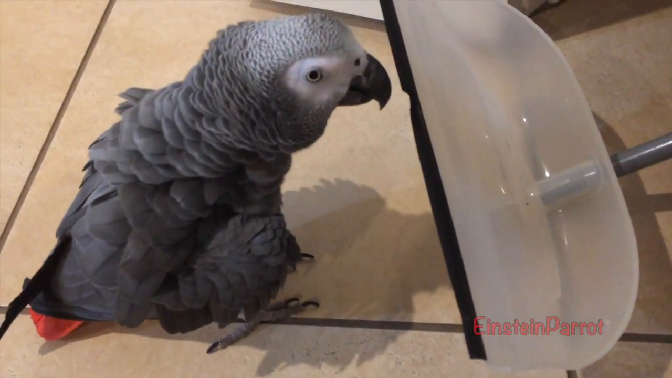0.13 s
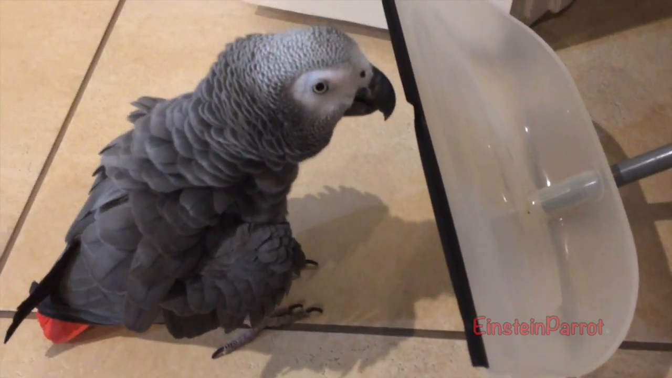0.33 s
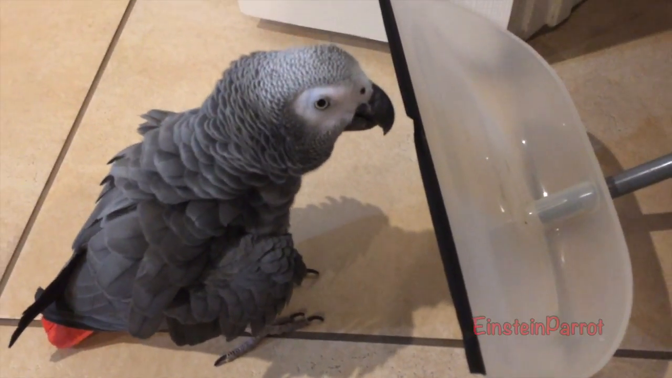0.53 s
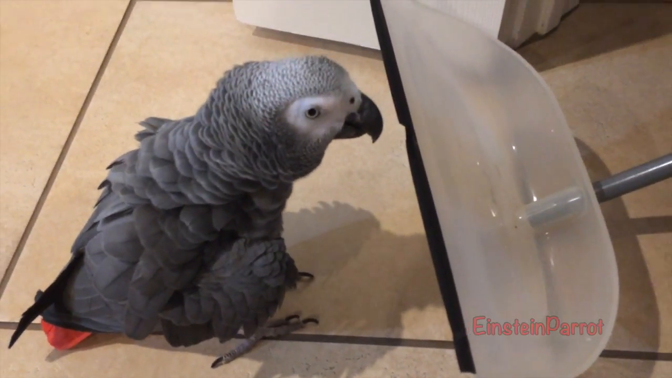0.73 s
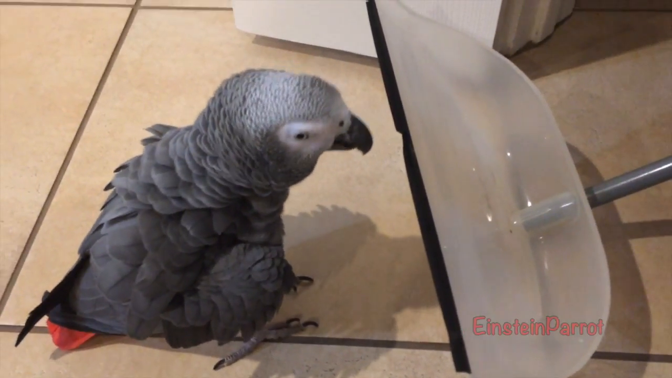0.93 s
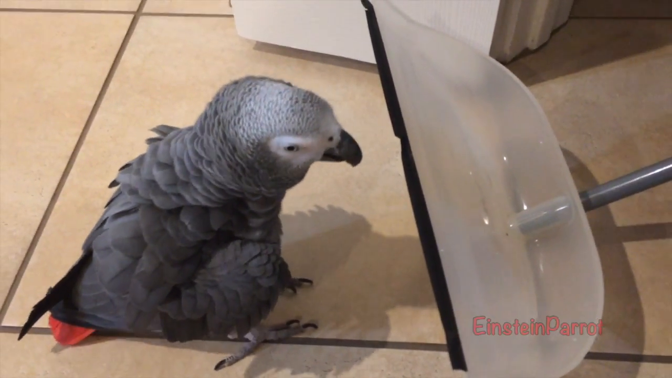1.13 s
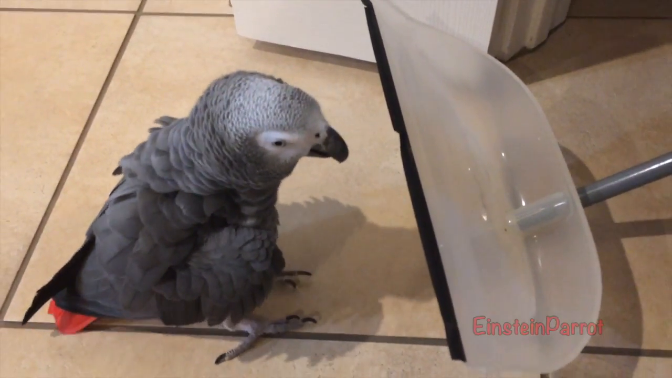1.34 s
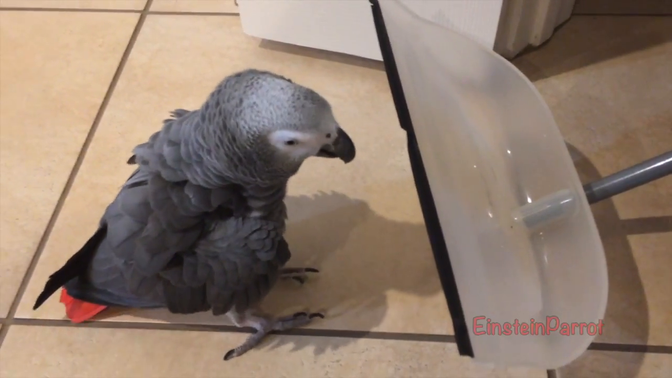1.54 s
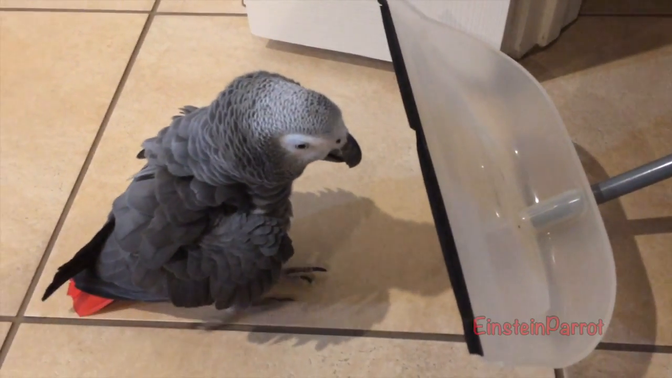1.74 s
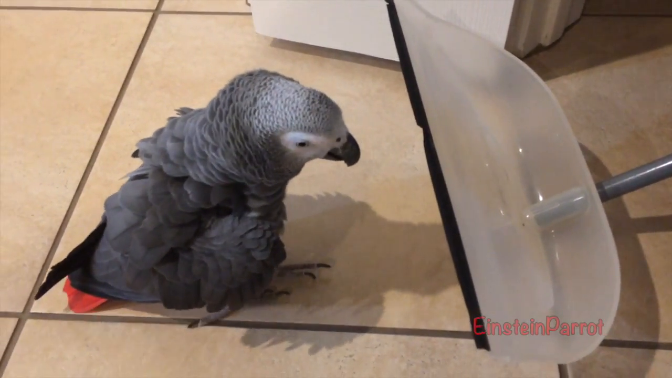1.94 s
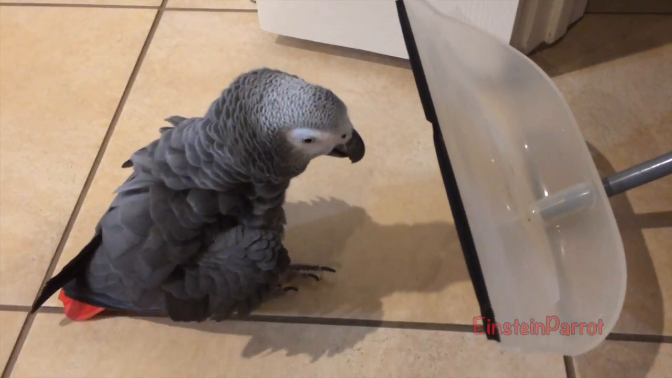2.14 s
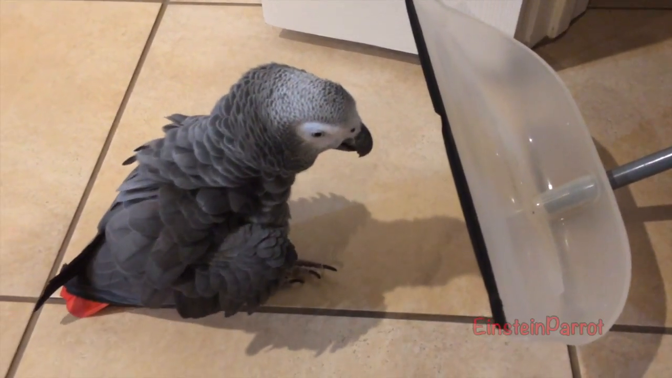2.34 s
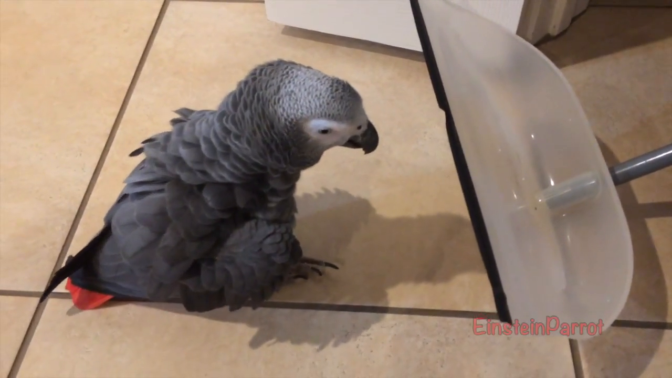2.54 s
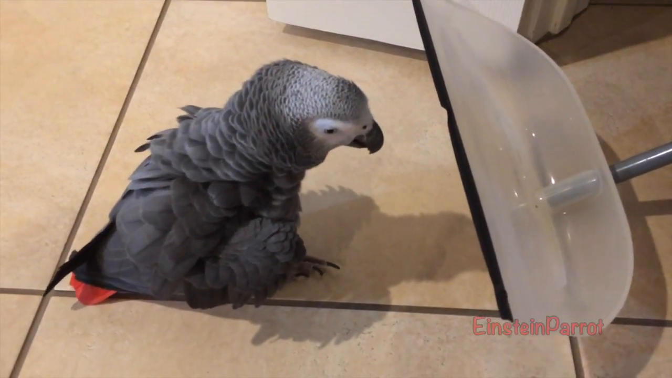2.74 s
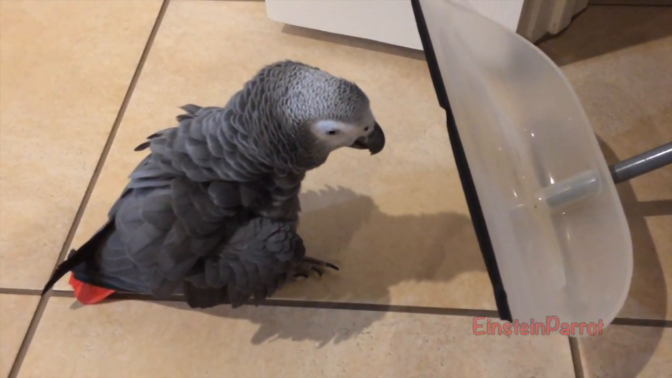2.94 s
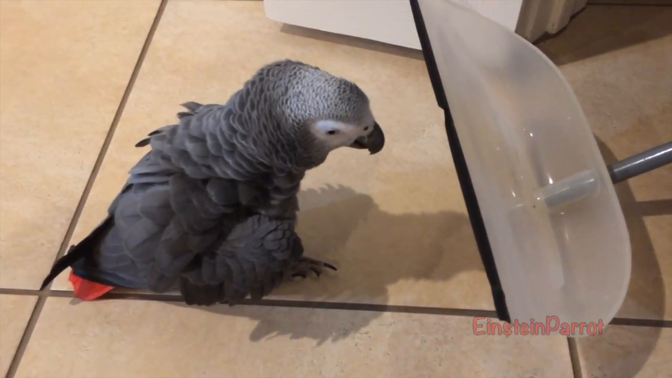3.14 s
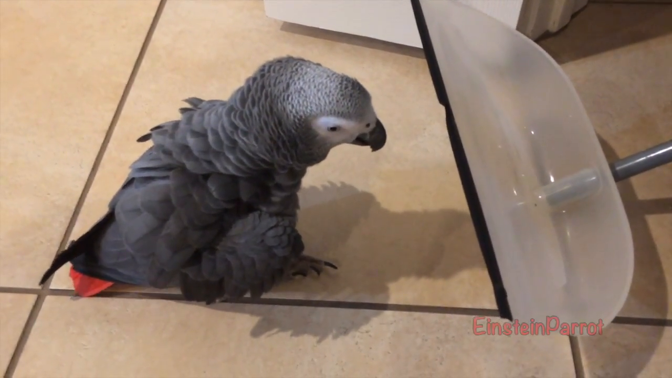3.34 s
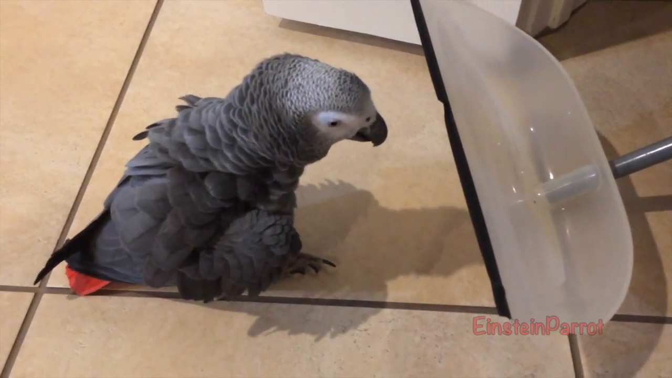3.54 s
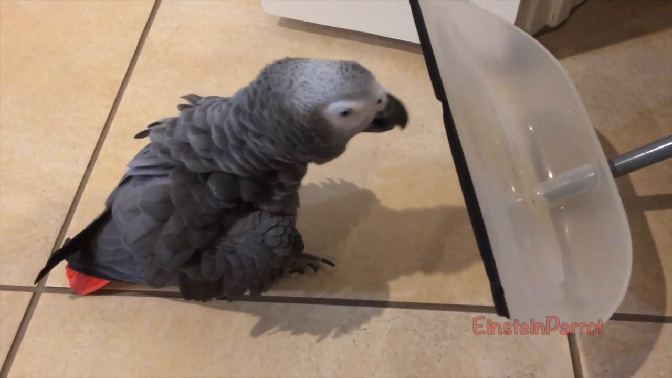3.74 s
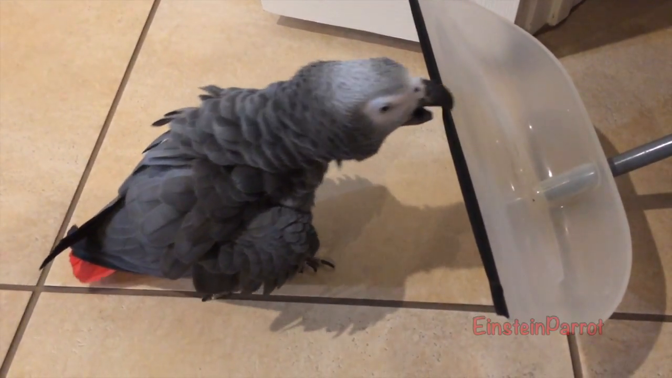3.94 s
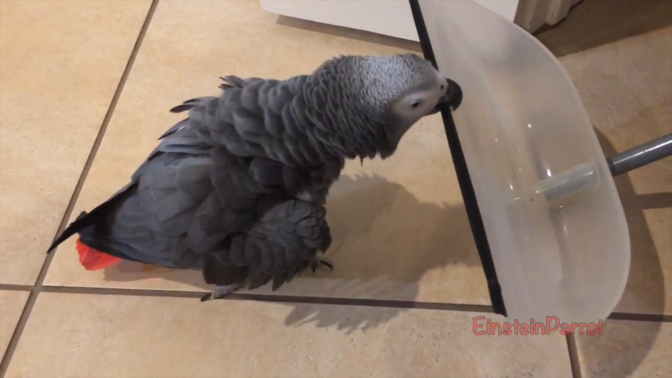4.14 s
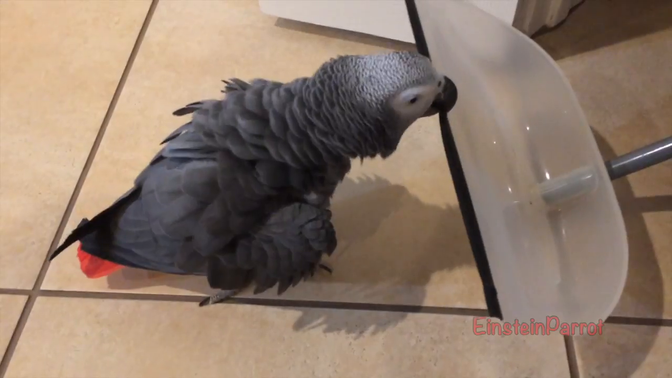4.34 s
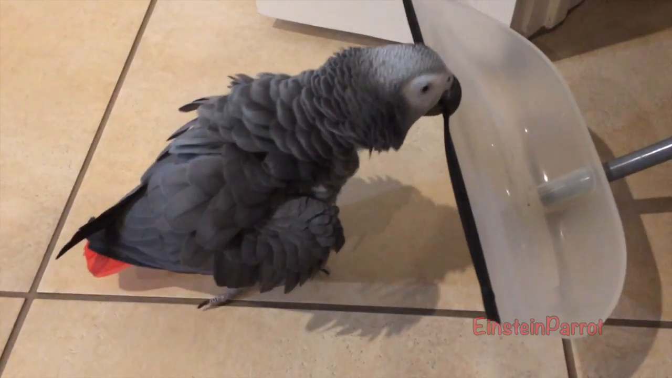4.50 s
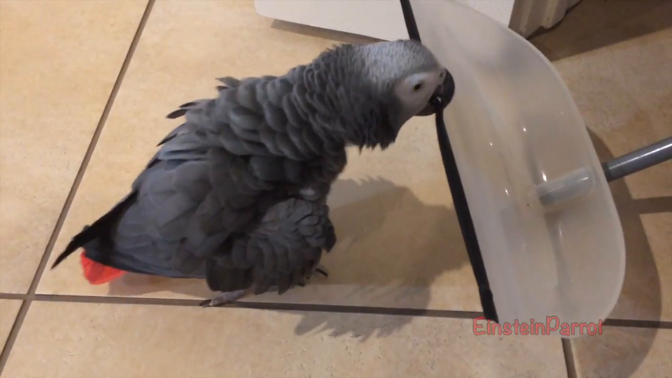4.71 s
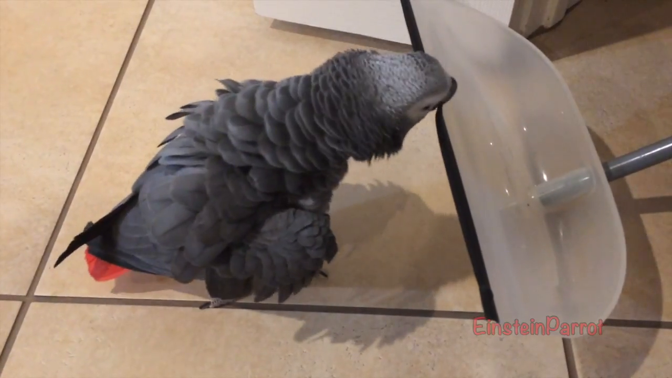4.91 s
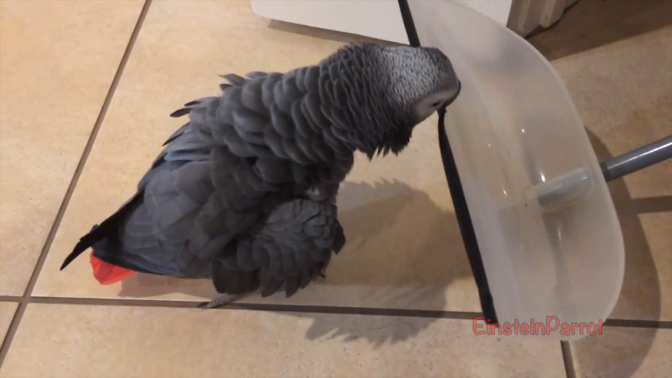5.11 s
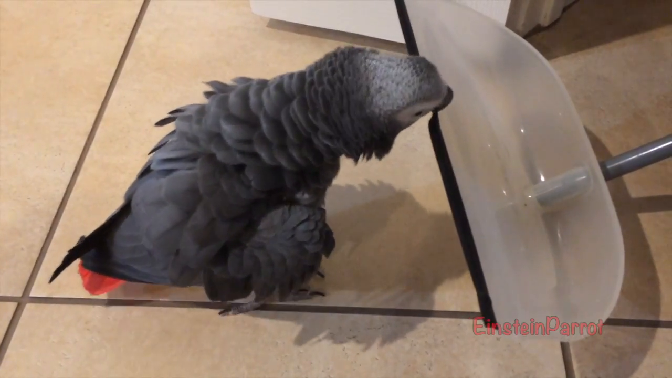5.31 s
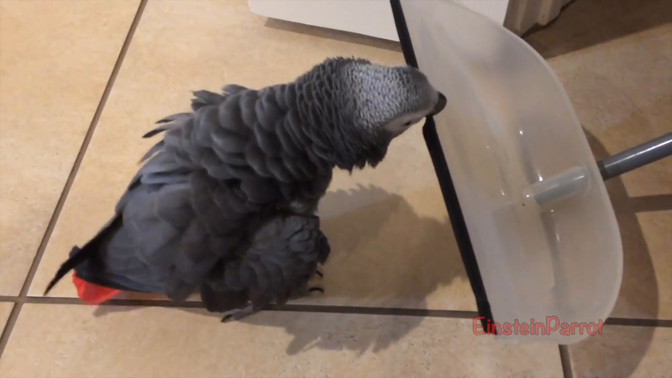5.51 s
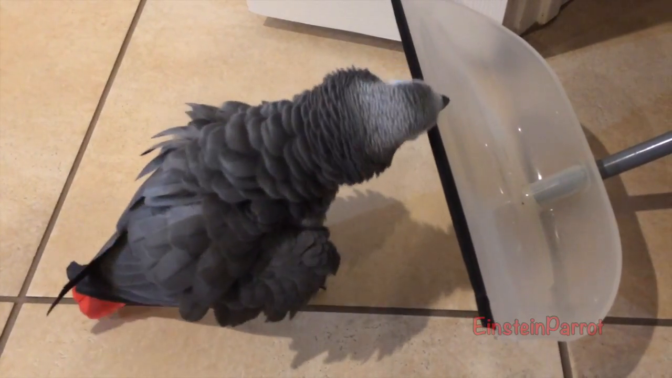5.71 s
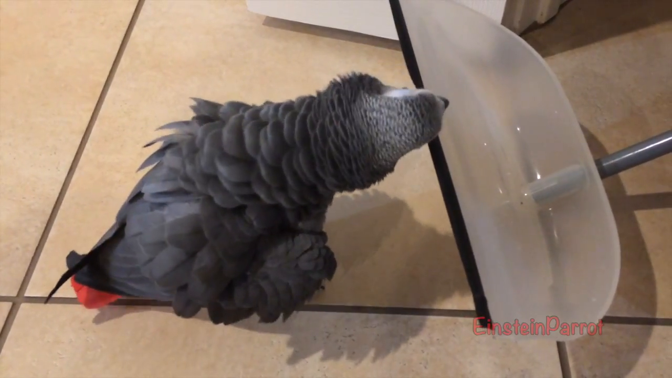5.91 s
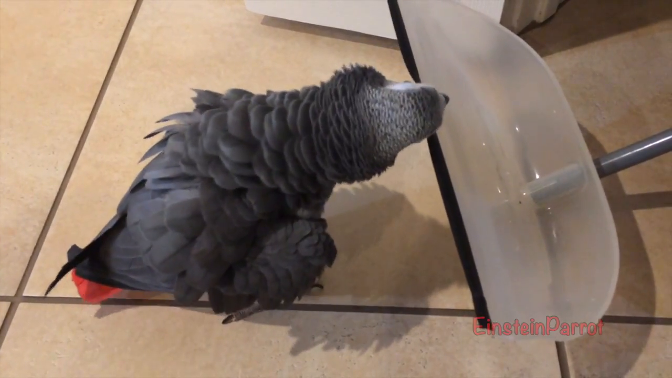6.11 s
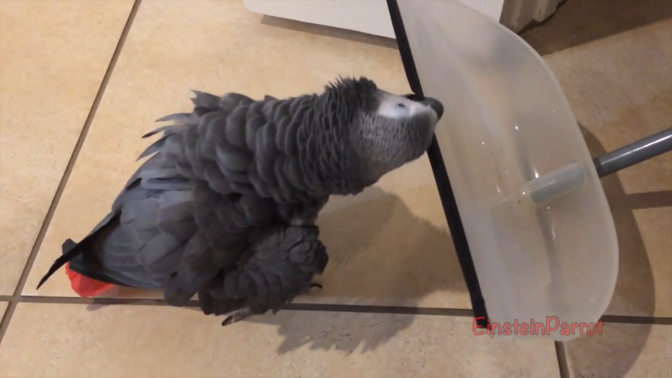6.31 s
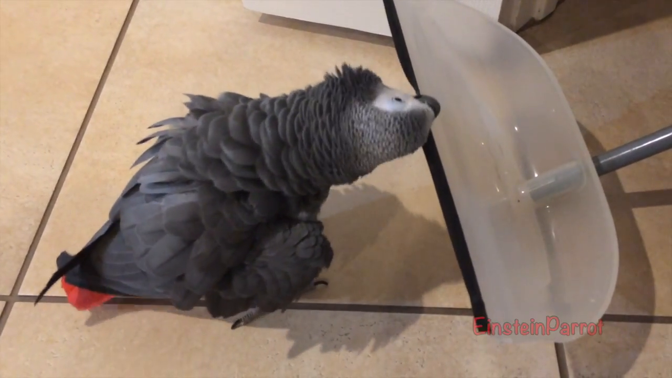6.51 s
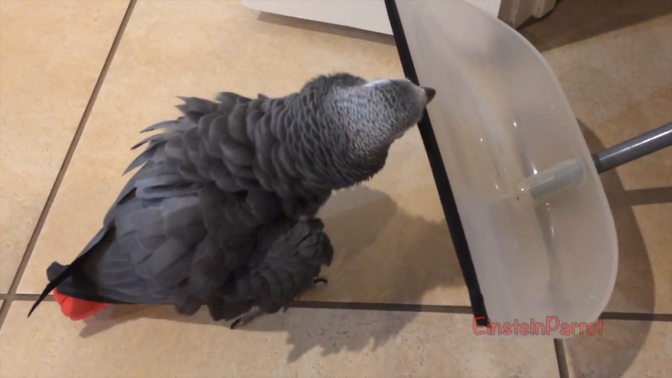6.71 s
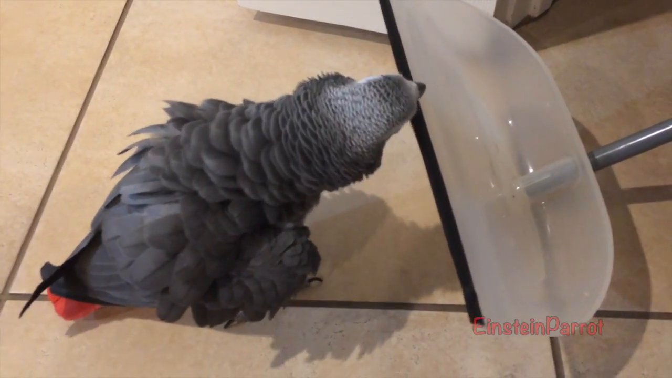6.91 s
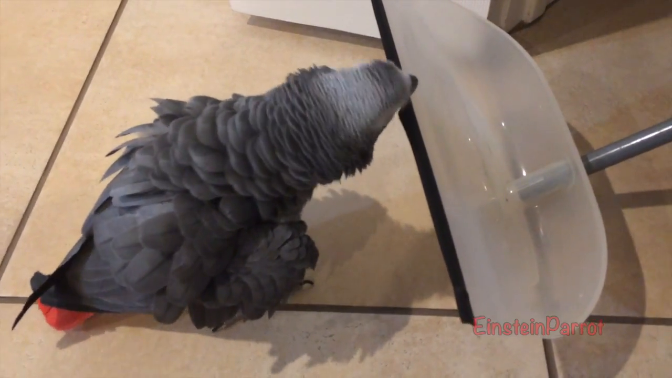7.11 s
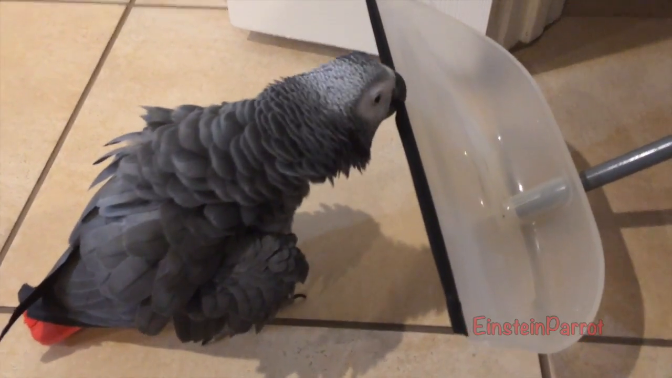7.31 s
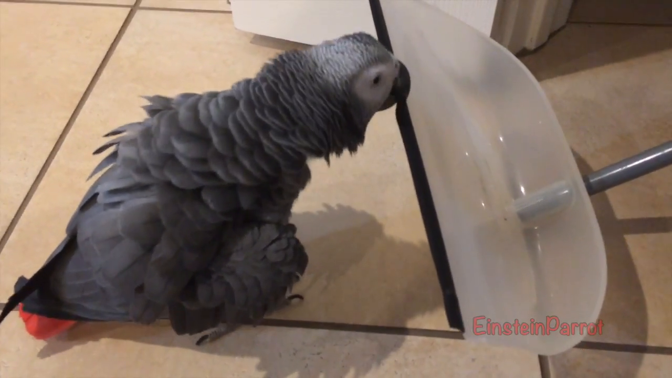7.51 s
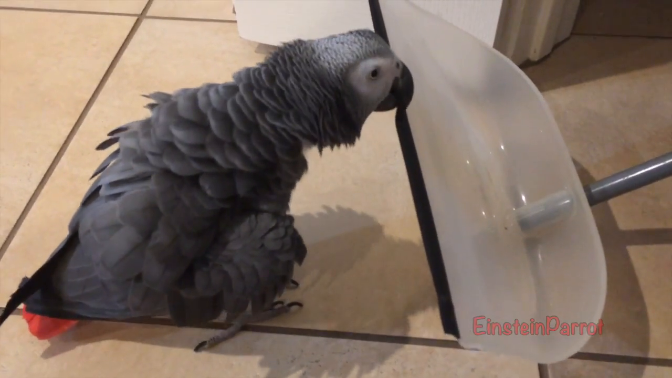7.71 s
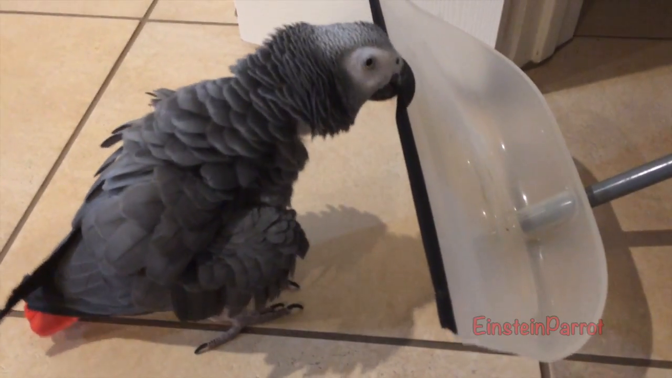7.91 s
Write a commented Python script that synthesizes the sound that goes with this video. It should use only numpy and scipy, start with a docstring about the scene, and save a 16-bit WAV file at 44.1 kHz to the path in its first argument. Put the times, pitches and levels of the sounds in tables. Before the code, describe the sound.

A grey parrot creaks faintly, snaps its beak on a plastic dustpan, then growls in harsh, rasping, throbbing bursts in a quiet tiled room.

```python
"""On a tiled floor in a quiet room, a grey parrot creaks softly, growls at a plastic dustpan and nibbles its edge.
The voice is a train of uneven pulses from the syrinx that rings windpipe, throat and beak, with puffs of air
for rasp and hiss. Beak and claw clicks are short blows coloured between dull knock and bright snap.
Tiles, pan and cupboard throw it all back as echoes; shaped noise gives the room's faint hum and hiss."""
import sys
import numpy as np
from scipy import signal
from scipy.io import wavfile
from scipy.ndimage import uniform_filter1d

SR = 44100
rng = np.random.default_rng(int(sys.argv[2]) if len(sys.argv) > 2 else 0)


def unload_wav(signal):
    """Save mono or channel-first audio to the path in sys.argv[1] as 16-bit WAV at rate SR, clipped to [-1, 1]."""
    wavfile.write(
        sys.argv[1],
        SR,
        np.round(np.clip(np.atleast_2d(signal).T, -1, 1) * 32767).astype(np.int16),
    )


def elevation(decibels):
    """Turn decibel levels (scalar or array-like) into linear amplitude ratios."""
    levels = np.asarray(decibels, float)
    return 10 ** (levels / 20)


N = 350595
START_LAG_S = 0.000978  # creaks, clicks and strong throbs start this long after their table times

# colour of the room hum and microphone hiss: (frequency [Hz], relative level [dB])
HUSH_COLOUR = [(12, -52), (20, -31), (41, -45), (65, -1), (123, -5.5), (149, -20.5), (181, -15),
               (261, -20.5), (375, -20), (942, -27.5), (1110, -29), (14500, -37.5), (15800, -47.5)]
# single slow pulses of the quiet creak: (time [s], level [dB], throat centre [Hz])
CREAKS = [(0.018, -50, 990), (1.345, -46.5, 770), (1.552, -45.5, 830), (1.571, -43.5, 736),
          (1.596, -42.5, 880), (1.602, -41.5, 890), (1.634, -40.5, 846), (1.672, -47, 850),
          (1.692, -43, 745), (1.759, -39.5, 880), (1.831, -38.5, 880), (1.913, -40, 696), (1.983, -45, 940),
          (2.018, -45.5, 890), (2.084, -39, 900), (2.094, -35.5, 920), (2.138, -38.5, 900),
          (2.191, -41.5, 884), (2.249, -42.5, 880), (2.325, -38, 930), (2.967, -49.5, 624),
          (3.505, -40.5, 920), (3.614, -47.5, 875), (3.906, -49, 877.5)]
# faint runs of creak pulses: (start [s], length [s], pulse rate [1/s], level [dB])
PURRS = [(1.243, .3, 11, -57), (2.924, .19, 27, -53.5)]
# fixed resonances beside the creak's throat centre: (frequency [Hz], width [Hz], level [dB])
CREAK_RESONANCES = [(255, 360, 1), (550, 94, -3.5), (1510, 260, -9.5), (3300, 200, -12.5)]
# side pocket of the throat that swallows a band: (frequency [Hz], width [Hz], gain [dB])
THROAT_POCKET = (3800, 450, -12)
# beak and claw on plastic and tile: (time [s], level [dB], crack re level [dB], snap [0 knock - 1 snap])
CLICKS = [(1.066, -55, -6, .3), (1.113, -32.5, -23, 0.022), (3.665, -28.5, -23, 0.22),
          (3.815, -58, 3, 0.13), (3.936, -62, 5, 0.23), (4.16, -21, -12.5, 0.74), (5.12, -21, -3.5, 0.85),
          (7.427, -17, -19.5, 0.97), (7.501, -35.5, -14, 0.95), (7.799, -42.5, 1, 1)]
# colour of a dull knock: (frequency [Hz], relative level [dB])
KNOCK_COLOUR = [(59, -69), (100, -4.5), (337, -3), (837, 3), (1140, -3.5), (1600, -3), (2420, -17),
                (3710, -8.5), (6000, -57), (7800, -73), (13200, -120)]
# colour of a bright snap: (frequency [Hz], relative level [dB])
SNAP_COLOUR = [(120, -33), (200, -19), (422, -21), (829, -3.5), (1520, -1.5), (2170, -5.5), (4250, -10),
               (4730, 7), (6640, -25), (12800, -10), (14000, -59)]
# pulse train of the growl: (time [s], rate before wobble [1/s], unevenness of spacing [0-1])
PULSING = [(3.9, 120, .4), (4.42, 215, .1), (4.62, 215, .12), (4.75, 200, .2), (4.92, 225, .12),
           (5.0, 115, .3), (5.8, 170, .37), (6.5, 150, .35), (6.78, 102, .15), (6.92, 102, .15),
           (7.05, 160, .35), (7.55, 98, .2), (7.95, 105, .25)]
# push behind the growl, before the breath dips: (time [s], level [dB])
EFFORT = [(3.9, -100), (3.94, -50.5), (4.15, -41.5), (4.28, -51), (4.35, -33.5), (4.55, -33.5), (4.86, -34),
          (4.9, -47), (5.24, -36.5), (5.32, -31), (5.46, -29.5), (5.66, -22.5), (5.88, -38.5),
          (6.02, -32.5), (6.35, -35.5), (6.4, -36.5), (6.74, -34.5), (6.77, -31.5), (7.06, -33),
          (7.1, -40.5), (7.28, -35.5), (7.33, -55.5), (7.52, -44), (7.95, -35)]
# airflow reversals, where pulses flip sign and sink: (time [s], dip [dB])
BREATH_TURNS = [(4.669, -13), (5.721, -20), (6.1, -16), (7.09, -3.5), (7.45, -14)]
# strongest throbs of the growl, each led by one hard pulse: (time [s], level before trims [dB])
THROBS = [(3.937, -27.5), (3.965, -17.5), (4.01, -20), (4.081, -22.5), (4.144, -35), (4.35, -35),
          (4.383, -22), (4.418, -16.5), (4.467, -12.5), (4.825, -14.5), (5.093, -19), (5.203, -19),
          (5.242, -15.5), (5.289, -12), (5.331, -8.5), (5.376, -15), (5.437, -10), (5.46, -6.5),
          (5.542, -16), (5.582, -13), (5.625, -11), (5.783, -26), (5.825, -29), (5.916, -11.5),
          (6.003, -14.5), (6.227, -25.5), (6.355, -12.5), (6.634, -17), (6.67, -16.5), (6.708, -16.5),
          (6.765, -13.5), (6.834, -11), (6.853, -12.5), (6.877, -12), (7.167, -16.5), (7.227, -17),
          (7.27, -28), (7.318, -18), (7.397, -23.5), (7.519, -25.5), (7.57, -28.5), (7.687, -18.5),
          (7.771, -18.5), (7.861, -21.5)]
# moving voice: (time [s], mouth resonance [Hz], throat drive re effort [dB], beak drive re effort [dB])
MOUTH = [(3.9, 1010, -24, -63), (4.16, 1200, -12.5, -19), (4.358, 1119, -22, -34), (4.52, 1076, -12.5, -36),
         (4.66, 1093, -31, -20), (4.78, 1204, -4.5, -25.5), (4.97, 1480, -14, -39),
         (5.15, 1080, -20, -15.5), (5.41, 1210, -5.5, -3), (5.65, 1180, -9.5, -1.5), (5.93, 1505, -4, -49),
         (6.17, 1005, -22, -16), (6.35, 1250, -2, -28), (6.52, 1306, -12, -21.5), (6.68, 1350, -12.5, -2.5),
         (6.81, 1573, 10, -9), (6.96, 1514, -3, -26), (7.13, 960, -12.5, -8), (7.25, 1400, -12.5, -42),
         (7.57, 1026, -16, -48), (7.78, 1107, -14, -40), (7.86, 1175, -14, -16.5), (7.95, 1225, -12, -13.5)]
# moving ring of the open beak: (time [s], frequency [Hz])
GAPE = [(5.1, 3457), (5.23, 2670), (5.77, 3290), (5.85, 2860), (6.5, 2720), (6.53, 3117), (6.89, 2789),
        (7.77, 2900), (7.95, 3194)]
# chest resonances: (frequency [Hz], width [Hz], level [dB])
CHEST = [(134, 89, -4), (221.5, 79, -4.5), (339.6, 194, -0.5)]
# windpipe resonances: (frequency [Hz], width [Hz], level [dB])
WINDPIPE = [(518, 53, -6), (613, 75, 3.5), (730, 20, -5), (1016, 460, 1.5), (1398, 85, 0.5)]
# throat resonances: (frequency [Hz], width [Hz], level [dB])
THROAT = [(1705, 123, 3.5), (1900, 250, -2.8), (2177, 180, 1.8)]
# beak resonances: (frequency [Hz], width [Hz], level [dB])
BEAK = [(2690, 110, 1), (3420, 1090, 0.58)]
# resonances that colour the rasp: (frequency [Hz], width [Hz], level [dB])
RASP = [(4580, 500, 1), (5350, 240, -4.2)]
# resonances that colour the hiss of the voice: (frequency [Hz], width [Hz], level [dB])
HISS = [(5650, 390, 2), (6330, 1700, 14.5), (7670, 760, 2), (9170, 1500, 2.5), (12460, 5800, -4)]
# tile, pan and cupboard reflections: (delay [s], level [dB])
ECHOES = [(.0040, -12.5), (.0054, -14.5), (.0094, -27.5), (0.0105, -13), (.021, -43)]
# decay of the room tail: (frequency [Hz], 60 dB decay time [s])
ROOM_DECAY = [(250, 0.26), (1000, 0.17), (4000, 0.16), (12000, 0.18)]


def evened(x):
    """Scales to rms 1."""
    return x / np.sqrt(np.mean(x ** 2) + 1e-20)


def read(points, hz):
    """Reads a table on a log-frequency axis."""
    f, value = np.transpose(points)
    return np.interp(np.log(hz + 1), np.log(f + 1), value)


def sudden(gain):
    """The most sudden causal (minimum-phase) pulse with this magnitude, energy 1."""
    log = np.log(np.maximum(gain, gain.max() * 1e-5))
    full = np.concatenate([log, log[-2:0:-1]])
    h = np.fft.ifft(np.exp(full - 1j * signal.hilbert(full).imag)).real[:4096]
    return h / np.linalg.norm(h)


def ring(modes, steep=1.92):
    """Pulse through a bank of resonances with skirts of the given steepness, less the throat pocket's band."""
    f = np.fft.rfftfreq(8192, 1 / SR) + 1
    gain = sum(elevation(db) * (1 + ((f - hz * hz / f) / width) ** 2) ** (-steep / 2) for hz, width, db in modes)
    pocket_hz, pocket_width, pocket_db = THROAT_POCKET
    return sudden(gain * elevation(pocket_db * np.exp(-((f - pocket_hz) / pocket_width) ** 2)))


def train(s, size):
    """Impulses of the given sizes at the given times."""
    out = np.zeros(N)
    np.add.at(out, np.clip(np.round(np.asarray(s) * SR).astype(int), 0, N - 1), size)
    return out


def through(x, h):
    """Convolves and keeps the length."""
    return signal.oaconvolve(x, h)[:N]


def hush():
    """Room hum and microphone hiss: random short-time spectra under one colour."""
    level_db = -66  # rms
    frames, hz = N // 512 + 5, np.fft.rfftfreq(2048, 1 / SR)
    real, imag = rng.standard_normal((frames, 1025, 2)).T
    spectra = (real + 1j * imag) * elevation(read(HUSH_COLOUR, hz)[:, None])
    noise = signal.istft(spectra, nperseg=2048, noverlap=1536)[1][:N]
    return elevation(level_db) * evened(noise)


def purrs():
    """Rows of faint creak pulses, loosely spaced along each run."""
    centre_hz, stray, spread_db = 830., 0.081, 3.5
    rows = []
    for (start, length, rate, db), z in zip(PURRS, rng.standard_normal((len(PURRS), 12, 3))):
        times = start + (np.arange(len(z)) + .1 * z[:, 0]) / rate
        levels = db + spread_db * z[:, 1]
        centres = centre_hz * np.exp(stray * z[:, 2])
        rows += [row for row in zip(times, levels, centres) if row[0] < start + length]
    return rows


def creak():
    """Each slow pulse and its one rebound ring the half-shut throat at its own centre, over a faint airy hiss."""
    width_hz, centre_db = 300.0, 6.0
    stray, stray_db = .1, 3.  # chance detuning (share) and level spread of the fixed resonances
    rebound_s, rebound_db, rebound_spread_db = 0.0089, -10, 4.
    air_from_s, air_to_s, air_fade_s, air_db = 1.5, 2.38, .08, -77.
    t = np.arange(N) / SR
    out = elevation(air_db) * evened(np.diff(rng.standard_normal(N + 1)))
    out *= np.clip(np.minimum(t - air_from_s, air_to_s - t) / air_fade_s, 0, 1)
    for s, db, hz in CREAKS + purrs():
        luck = np.clip(rng.standard_normal((2, len(CREAK_RESONANCES) + 1, 2)), -2, 2)
        late_luck, drop_luck = luck[0, -1]
        delays = (0, rebound_s * np.exp(0.193 * late_luck))
        drops_db = (0, rebound_db + rebound_spread_db * drop_luck)
        for late, drop_db, y in zip(delays, drops_db, luck):
            modes = [(f * (1 + stray * a), w, d + stray_db * b)
                     for (f, w, d), (a, b) in zip(CREAK_RESONANCES, y)]
            h = ring(modes + [(hz, width_hz, centre_db)])
            part = out[round((s + late + START_LAG_S) * SR):][:len(h)]
            part -= elevation(db + drop_db) * h / abs(h).max()
    return out


def clicks():
    """A dry blow with a short rattle, coloured between knock and snap, plus a bright crack of noise."""
    crack_s, rattle_s, rattle = .0015, .005, .045
    t, f = np.arange(4096) / SR, np.fft.rfftfreq(8192, 1 / SR)
    luck, out = rng.standard_normal((len(CLICKS), 2, len(t))), np.zeros(N)
    treble = signal.butter(2, [3200., 13000.], "band", fs=SR)
    for (s, db, crack_db, snap), (rattle_noise, crack_noise) in zip(CLICKS, luck):
        snap = np.clip(snap, 0, 1)
        colour = sudden(elevation((1.5 - snap) * read(KNOCK_COLOUR, f) + snap * read(SNAP_COLOUR, f)))
        strike = (t == 0) + rattle * rattle_noise * np.exp(-t / rattle_s)
        blow = signal.fftconvolve(strike, colour)[:len(t)]
        crack = signal.lfilter(*treble, crack_noise * np.exp(-t / crack_s))
        # a louder crack leaves less for the blow; snaps push the other way
        body = np.sqrt(np.clip(1 - elevation(2 * crack_db), .01, 1)) * (1 if snap < .5 else -1)
        part = out[round((s + START_LAG_S) * SR):][:len(t)]
        part += elevation(db) * (body * blow / abs(blow).max() + elevation(crack_db) * crack / abs(crack).max())
    return out


def effort(s):
    """Effort in dB, sinking to each turn of the breath and returning after it."""
    sink_s, return_s = 0.099, 0.11
    dips = sum(db * np.clip(np.where(s < turn, 1 - (turn - s) / sink_s, 1 - (s - turn) / return_s), 0, 1)
               for turn, db in BREATH_TURNS)
    return np.interp(s, *np.transpose(EFFORT)) + dips


def throbs():
    """The strong throbs, and lesser ones by chance wherever those leave room and the pulses are uneven."""
    gap_s, over_effort_db, spread_db = .042, 7., 3.5
    steady = .18  # up to this unevenness the pulses run on without lesser throbs
    when, level_db = np.transpose(THROBS)
    luck = np.clip(rng.standard_normal((200, 2)), -2, 2)
    more = when[0] + np.cumsum(gap_s * np.exp(.25 * luck[:, 0]))
    free = (abs(more[:, None] - when).min(axis=1) > gap_s * .6) & (more < N / SR)
    free &= np.interp(more, *np.transpose(PULSING)[::2]) > steady
    more_db = effort(more) + over_effort_db + spread_db * luck[:, 1]
    when, level_db = np.append(when, more[free]), np.append(level_db, more_db[free])
    order = np.argsort(when)
    return when[order], level_db[order]


def resonate(x, hz, width):
    """A moving resonance: shift the curve hz to zero, smooth, shift back; pulse energy is kept."""
    turn, r = np.exp(2j * np.pi * np.cumsum(hz) / SR), np.exp(-np.pi * width / SR)
    return (turn * signal.lfilter([np.sqrt(2 * (1 - r * r))], [1, -r], x / turn)).real


def restless(s, size, modes, steep, stray=0.054):
    """A restless throat: each pulse takes one of five strayed shapes, each with its own small lag."""
    stray_db, lag_s, count = 2.5, 0.00062, 5
    pick, out = rng.integers(0, count, len(s)), np.zeros(N)
    for k, z in enumerate(rng.standard_normal((count, len(modes), 2))):
        shape = [(hz * (1 + stray * a), width, db + stray_db * b) for (hz, width, db), (a, b) in zip(modes, z)]
        pulses = train(s[pick == k] + lag_s * rng.random(), size[pick == k])
        out += through(pulses, ring(shape, steep))
    return out


def growl():
    """Uneven pulses come in throbs and drive fixed resonances, a moving mouth and puffs of air."""
    spread_db, spread_db_per_uneven = 1.8, 4.5  # uneven pulses also differ more in strength
    throb_trim_db, lift_db, lift_s, stall_s = -4., 6., .022, .007
    chest_db, chest_follow = -22.5, 0.76  # the chest follows the effort in dB only in part
    mouth_width_hz, mouth_mid_hz, mouth_db_per_octave = 91.0, 1200., 7  # higher mouth rings louder
    gape_width_hz, gape_db, soft_hz = 230, -16.5, 1730.0
    puff_s, rasp_spread_db, throb_rasp_db = 0.0042, 3.5, -23  # rasp of a throb is re effort

    t = np.arange(N) / SR
    p, *columns = np.transpose(PULSING)
    rate, uneven = (np.interp(t, p, c) for c in columns)
    wobble = evened(uniform_filter1d(rng.standard_normal(N), size=200))
    turns = np.cumsum(rate * np.exp(uneven * wobble) * (t > p[0])) / SR
    k = np.flatnonzero(np.diff(np.floor(turns)))
    when, throb_db = throbs()
    when = when + START_LAG_S
    # the folds stall just before a strong pulse
    ahead = when[np.minimum(np.searchsorted(when, t[k] - stall_s / 2), len(when) - 1)] - t[k]
    k = k[(ahead > stall_s) | (ahead < -stall_s / 2)]
    luck = np.clip(rng.standard_normal((len(k), 2)), -2, 1.3)
    # the pulses after a strong one start raised and sink until the next throb
    since = t[k] - when[np.maximum(np.searchsorted(when, t[k]) - 1, 0)]
    bed_db = lift_db * (np.exp(-abs(since) / lift_s) - .5)
    bed_db += (spread_db + spread_db_per_uneven * uneven[k]) * luck[:, 0]

    at = np.concatenate([t[k], when])
    effort_db = effort(at)
    # the effort is taken off the throbs here, as it is added to all pulses below
    strong = elevation(throb_db + throb_trim_db - effort_db[len(k):]) / abs(ring(WINDPIPE)).max()
    size = np.concatenate([np.sqrt(SR / rate[k]) * elevation(bed_db), strong])
    size *= (-1.) ** np.searchsorted(np.transpose(BREATH_TURNS)[0], at)
    pushed = size * elevation(effort_db)

    s, mouth_hz, throat_db, beak_db = np.transpose(MOUTH)
    voice = restless(at, pushed, WINDPIPE, 2.5, stray=0.0064)
    chest_pulses = train(at, size * elevation(chest_db + chest_follow * effort_db))
    voice += through(chest_pulses, ring(CHEST, 4.67))
    soft = signal.lfilter(*signal.butter(2, soft_hz, fs=SR), train(at, pushed))  # the folds close softly
    open_hz = np.interp(t, s, mouth_hz)
    mouth_gain = elevation(mouth_db_per_octave * np.log2(open_hz / mouth_mid_hz))
    voice += mouth_gain * resonate(soft, open_hz, mouth_width_hz)
    voice += restless(at, size * elevation(effort_db + np.interp(at, s, throat_db)), THROAT, 2.65)
    beak = restless(at, size * elevation(effort_db + np.interp(at, s, beak_db)), BEAK, 2.78)
    gape_hz = np.interp(t, *np.transpose(GAPE))
    voice += beak / 2 + elevation(gape_db) * resonate(beak, gape_hz, gape_width_hz)

    # each pulse also forces a short puff past the tongue; air noise grows as throat and beak open
    rasp_db = -14.5 + 0.76 * throat_db + 0.099 * beak_db
    hiss_db = -12 + 0.24 * throat_db + 0.44 * beak_db
    bed_rasp_db = np.interp(t[k], s, rasp_db) + rasp_spread_db * luck[:, 1]
    puff_db = effort_db + np.append(bed_rasp_db, np.full(len(when), throb_rasp_db))
    decay = np.exp(-np.arange(900) / SR / puff_s)
    air = through(train(at, size * elevation(puff_db)), decay / np.linalg.norm(decay)) * rng.standard_normal(N)
    hiss = air * elevation(np.interp(t, s, hiss_db - rasp_db))
    return voice + through(air, ring(RASP, 2.2)) - through(hiss, ring(HISS, 2.2))


def room(x):
    """A few close echoes, and a short sparse tail dying band by band."""
    tail_db = -7.5
    s, db = np.transpose(ECHOES)
    taps = np.zeros(SR // 2)
    at = np.arange(400, len(taps) - 20, 20)
    taps[at + rng.integers(0, 20, len(at))] = rng.choice([-1., 1.], len(at))
    hz, t, z = signal.stft(taps, SR, nperseg=256)
    fade = elevation(-60 * t / read(ROOM_DECAY, hz)[:, None])
    tail = signal.istft(z * fade, SR, nperseg=256)[1]
    near = x + through(x, train(s, elevation(db))[:2048])
    return near + elevation(tail_db) * through(x, tail / np.linalg.norm(tail))


def scene():
    """Bird and clicks in the room, over the hush."""
    background = hush()
    dry_sounds = creak() + clicks() + elevation(-3.0) * growl()
    return (room(dry_sounds) + background)[None]


def roll_off(x):
    """The treble ends steeply here."""
    return signal.sosfilt(signal.butter(12, 15950, fs=SR, output="sos"), x)


def record(dry):
    """The microphone's band limit: a steep low-pass rounds off the finished mix."""
    mic_edge_hz = 15300
    edge = signal.firwin(255, mic_edge_hz, window=("kaiser", 8), fs=SR)
    finished = signal.oaconvolve(dry, edge[None], "same")
    return roll_off(finished)


dry = scene()
out = record(dry)
unload_wav(out)
```